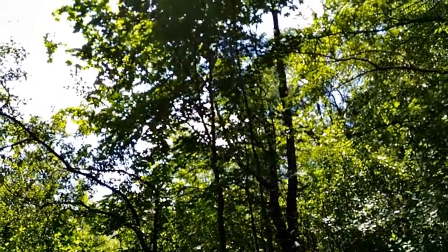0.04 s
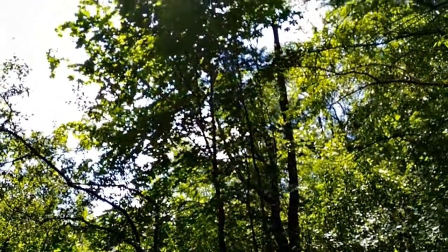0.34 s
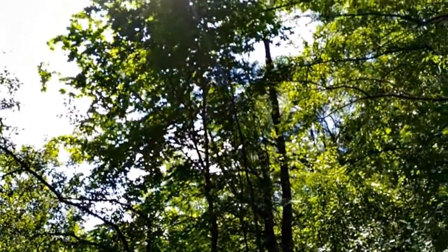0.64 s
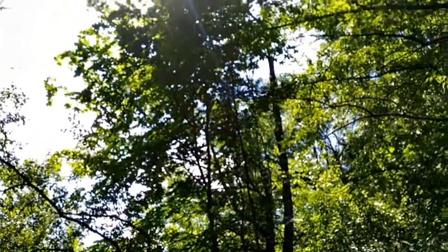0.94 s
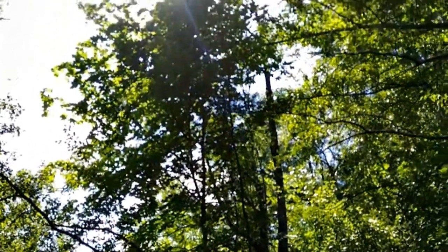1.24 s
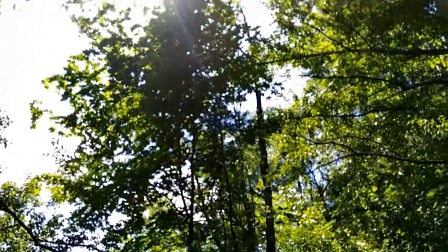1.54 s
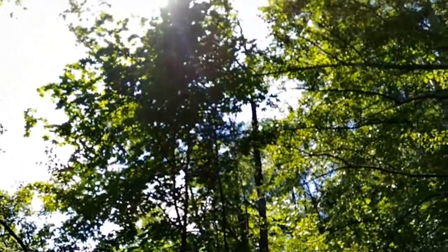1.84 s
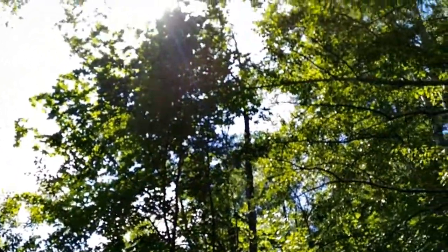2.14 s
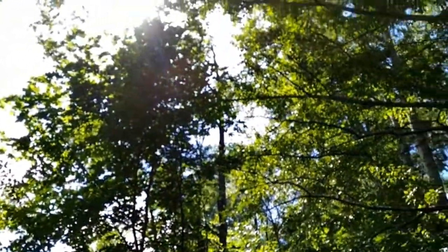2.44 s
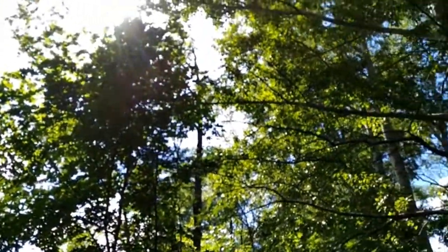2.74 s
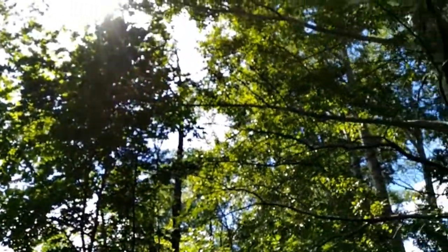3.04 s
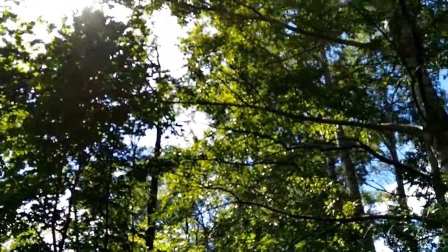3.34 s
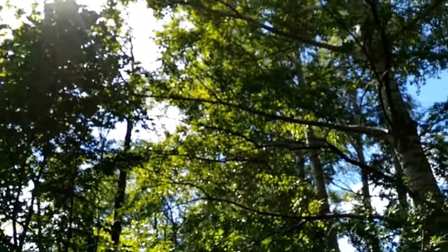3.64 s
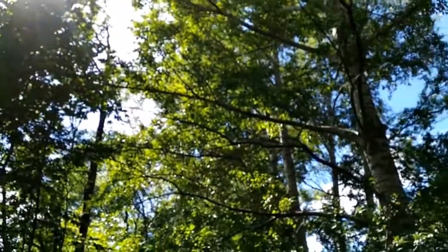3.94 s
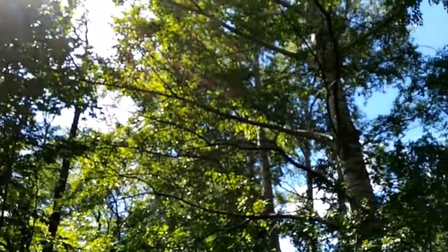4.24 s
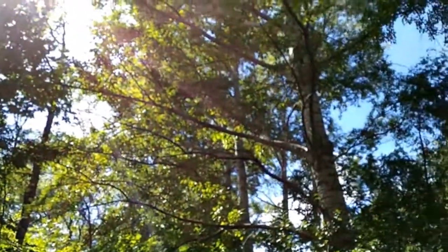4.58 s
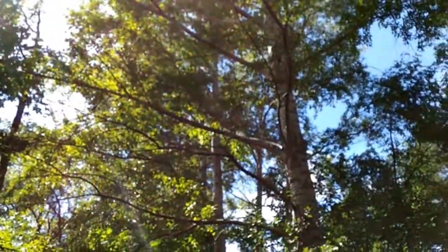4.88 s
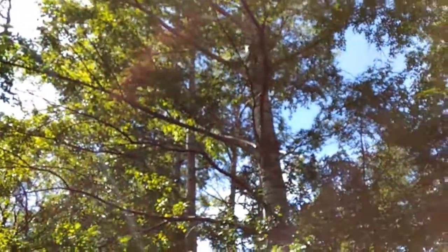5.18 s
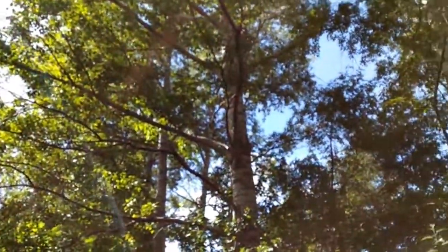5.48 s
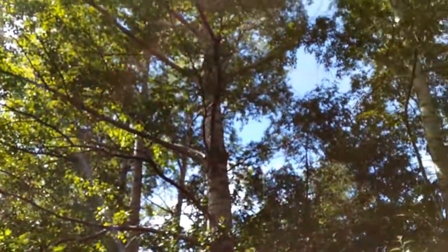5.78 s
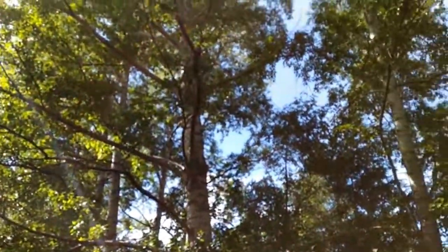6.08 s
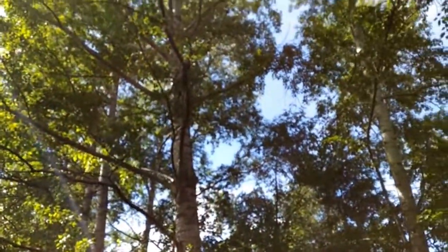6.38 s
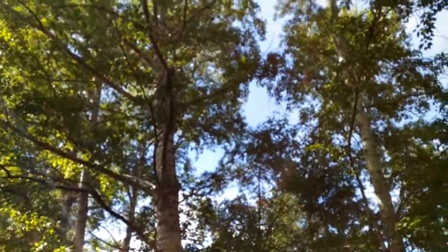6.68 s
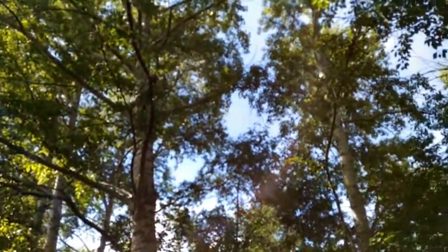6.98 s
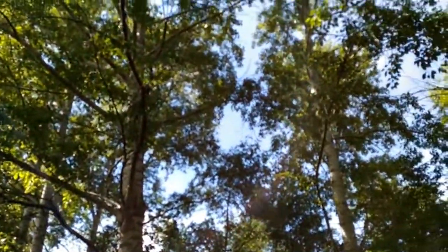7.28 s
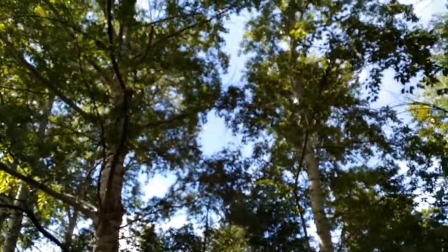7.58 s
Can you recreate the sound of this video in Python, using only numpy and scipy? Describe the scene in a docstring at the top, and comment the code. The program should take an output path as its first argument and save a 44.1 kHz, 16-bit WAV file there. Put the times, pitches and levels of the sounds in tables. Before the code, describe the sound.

Clear, high, downward chirps come steadily from one woodland bird, with a low engine rumble and a light breeze in the leaves behind.

```python
"""Songbird in a wood

Air moving through leaves makes a wash of noise over the low drone of a distant engine.
A small songbird's syrinx sounds twenty down-slurred, almost pure notes; trunks and leaves scatter each.
Other birds whistle thinly far off, and shoes shifting on the forest floor scuff softly nearby."""
import sys
import numpy as np
from scipy import signal
from scipy.fft import rfft, irfft
from scipy.io import wavfile
from scipy.ndimage import uniform_filter1d

SR = 44100
rng = np.random.default_rng(int(sys.argv[2]) if len(sys.argv) > 2 else 0)


def transcribe(u):
    """Save the signal u as a 16-bit wav file named by the first command-line argument.

    u: samples, shape (n,) or (channels, n), limited to [-1, 1]; the rate is SR.
    q: integer samples, one column per channel.
    """
    v = np.clip(np.atleast_2d(u).T, -1, 1)
    q = np.round(v * 32767).astype(np.int16)
    wavfile.write(sys.argv[1], SR, q)


N = 336042
TIME = np.arange(N) / SR
BINS = np.fft.rfftfreq(N, 1 / SR)
# The breeze in the crowns. Each row: time in seconds, rustle level in dB.
BREEZE_DB = [(0, -61.5), (.9, -65.5), (2.3, -66), (3.2, -71), (4.7, -68), (6, -73), (6.8, -68.5),
             (7.1, -80.5)]


def amp(db):
    """Amplitude ratio from decibels."""
    return 10 ** (np.asarray(db) / 20)


def unit(x):
    """Normalisation to rms 1."""
    return x / np.sqrt(np.mean(x ** 2) + 1e-20)


def read(points, hz):
    """Interpolation on a log-frequency axis."""
    f, value = np.transpose(points)
    return np.interp(np.log(hz + 1), np.log(f + 1), value)


def follow(points):
    """Linear interpolation of a time curve at each sample."""
    return np.interp(TIME, *np.transpose(points))


def add(mix, s, sound):
    """Superposition of a sound on the mix, starting at s seconds."""
    part = mix[max(round(s * SR), 0):][:len(sound)]
    part += sound[:len(part)]


def noise(gain):
    """Spectral shaping of white noise by a gain at each frequency, to rms 1."""
    return unit(irfft(rfft(rng.standard_normal(N)) * gain, N))


def drift(rate_hz):
    """Random fluctuation: low-pass noise of rms 1."""
    return noise(np.exp(-(BINS / rate_hz) ** 2) * (BINS > 0))


def leaves(patchy_db=2.5, flutter_db=2.7, hiss_db=-69.5):
    """Flow noise in foliage: a low wash and a fluttering rustle drift in patches over a steady hiss."""
    # Three noise spectra. Each row: frequency in Hz, relative spectral level in dB.
    wash_spectrum = [(70, -21), (130, 1), (200, 0), (370, -3), (940, -3.5), (1200, -7), (2100, -12),
                     (2900, -13), (5000, -30.5)]
    rustle_spectrum = [(700, -13), (1100, -5), (1500, -1), (2200, -0.5), (2600, -11.5), (3300, -13.5),
                       (6000, -35)]
    hiss_spectrum = [(1000, -16), (2600, 1.5), (4200, 1), (5500, 1.5), (7000, -4.5), (8300, -10),
                     (11000, -18.5), (14300, -32)]
    # The swell of the wash. Each row: time in seconds, level in dB.
    wash_db = [(0, -65.5), (.9, -62.5), (3, -63.5), (5.3, -62), (6.8, -65), (7.62, -66.5)]
    wash = amp(follow(wash_db)) * noise(amp(read(wash_spectrum, BINS)))
    rustle = amp(follow(BREEZE_DB) + flutter_db * drift(40)) * noise(amp(read(rustle_spectrum, BINS)))
    spectra = signal.stft(wash + rustle, SR, nperseg=1024, noverlap=768)[2]
    patches = rng.standard_normal(spectra.shape)
    for axis in 0, 1:  # smooth over frequency, then time
        patches = uniform_filter1d(patches, size=16, axis=axis, mode="wrap")
    breeze = signal.istft(spectra * amp(patchy_db * unit(patches)), SR, nperseg=1024, noverlap=768)[1]
    return breeze[:N] + amp(hiss_db) * noise(amp(read(hiss_spectrum, BINS)))


def distant_engine(drone_hz=44.43, waver=0.0181, surge_hz=5):
    """Atmospheric fading: two engine orders and a rumble each swell and sink, under faint whines."""
    # The rumble ahead of its low-pass. Each row: frequency in Hz, relative spectral level in dB.
    rumble_spectrum = [(8.8, -45), (15, -10.5), (32, -6.5), (64, 1), (86, -1.5), (101, 2.5), (119, -0.5),
                       (160, -36), (210, -32), (350, -120)]
    # The gain shared by drone and rumble. Each row: time in seconds, gain in dB.
    engine_db = [(0, -59.5), (.3, -60), (.6, -55), (1.5, -56.5), (2.3, -59.5), (3, -57.5), (4.3, -55.5),
                 (5.25, -54), (5.6, -57), (6.85, -55), (6.98, -62.5), (7.62, -61.5)]
    # Narrow bands of noise. Each row: centre in Hz, width in Hz, level in dB.
    whine_bands = [(1411.5, 35, -74), (1848, 12, -80), (2030, 220, -80)]
    phase = 2 * np.pi * np.cumsum(drone_hz * (1 + waver * drift(2.245))) / SR
    first = amp(-8 + 4 * drift(surge_hz)) * np.sin(phase)
    second = amp(-4 + 2 * drift(surge_hz)) * np.sin(2 * phase)
    colour = amp(read(rumble_spectrum, BINS)) / (1 + (BINS / 85) ** 4)
    rumble = amp(-6 + 3.5 * drift(surge_hz)) * noise(colour)
    whines = sum(amp(db) * noise(1 / (1 + (2 * (BINS - hz) / width) ** 2))
                 for hz, width, db in whine_bands)
    carry = unit(amp(follow(BREEZE_DB) / 2))  # the breeze carries the whines over
    return amp(follow(engine_db)) * (np.sqrt(2) * (first + second) + rumble) + whines * carry


def syrinx(hz, octave_db=-50):
    """Nearly sinusoidal oscillation: a pure tone with a trace of its second harmonic."""
    phase = 2 * np.pi * np.cumsum(hz) / SR
    return np.sqrt(2) * (np.sin(phase) + amp(octave_db) * np.sin(2 * phase))


def note(ledge_hz, hold_s, ending, dive_db, ledge_db,
         top_hz=6462, top_db=-9, settle_s=.04, attack_s=0.0039, release_s=0.015):
    """Source and filter: pitch dives to a ledge, then turns; throat and beak weight the amplitude."""
    # Named endings. Each row: target pitch in Hz, glide time in seconds, length in seconds,
    # level change over a full glide in dB.
    endings = {"drop": (3151, .04, .044, -13), "lift": (3726, 0.0153, 0.039, 5.3),
               "stop": (3150, 0.7, .008, -3)}
    # Transmission of throat and beak. Each row: frequency in Hz, gain in dB.
    beak = [(3100, -1), (3700, 0), (4400, -0.5), (5000, -1), (5700, -0.75), (6400, -1)]
    end_hz, glide_s, end_s, end_db = endings[ending]
    t = np.arange(0, hold_s + end_s, 1 / SR)
    depth_hz = top_hz - ledge_hz
    dive_s = .0097 * np.sqrt(depth_hz / 1999)  # deeper dives take longer
    height = np.exp(-(t / dive_s) ** 1.205)
    turned = np.sin(np.pi / 2 * np.clip((t - hold_s) / glide_s, 0, 1))
    hz = ledge_hz + depth_hz * height + (end_hz - ledge_hz) * turned ** 2
    effort_db = ledge_db + (dive_db - ledge_db) * np.exp(-(t / settle_s) ** 2)
    gate = np.minimum(t / attack_s, 1) * np.minimum((t[-1] - t) / release_s, 1)
    return hz, gate * amp(effort_db + top_db * height + end_db * turned + read(beak, hz))


def songbird(waver=0.0096, chip_waver=0.019, chip_s=0.0367, chip_fall_hz=476):
    """Frequency modulation of the syrinx: slurred notes, many followed by a soft, buzzier chip."""
    # The notes. Each row: start in seconds, ledge pitch in Hz, seconds to the end of the ledge,
    # name of the ending, effort in the dive in dB, effort on the ledge in dB.
    song = [ (.061, 5010, 0.029, "drop", -37, -34.5), (.390, 4266, .073, "drop", -38, -38.5),
            (.717, 3749, 0.082, "drop", -37.5, -41), (1.078, 3812, 0.1, "drop", -38.5, -40),
            (1.461, 5029, .034, "drop", -35.5, -32), (1.778, 4358, 0.075, "drop", -32, -38),
            (2.147, 3510, 0.061, "lift", -33, -41), (2.458, 3206, .102, "stop", -35, -48),
            (2.827, 3573, 0.055, "lift", -35.4, -40.5), (3.183, 4375, .076, "drop", -35.3, -37),
            (3.508, 4950, 0.043, "drop", -34.5, -35), (3.872, 3765, 0.078, "stop", -33.5, -38),
            (4.212, 3198, 0.1, "stop", -34.5, -50), (4.587, 3568, .065, "lift", -36, -38.8),
            (4.985, 4426, 0.071, "drop", -36, -41), (5.340, 4880, .047, "drop", -36, -34.5),
            (5.668, 3816, 0.084, "drop", -36.5, -37), (6.023, 3496, 0.066, "lift", -35.9, -41),
            (6.347, 3164, 0.09, "stop", -37, -51.5), (6.717, 3820, 0.077, "drop", -34, -37.5), ]
    # The falling chips. Each row: start in seconds, last pitch in Hz, level in dB.
    chips = [ (.154, 3965, -50), (.849, 3654, -45.5), (1.224, 3603, -44), (1.904, 3770, -44),
             (2.573, 3530, -42), (2.967, 3730, -41.5), (3.313, 3757, -40.5), (3.611, 3660, -41.5),
             (3.947, 4190, -38.3), (4.329, 3530, -39.5), (4.717, 3740, -45.2), (5.118, 3915, -41.5),
             (5.443, 3556, -46.5), (6.465, 3580, -47.5), ]
    out = np.zeros(N)
    unsteady = 1 + waver * drift(150)
    for s, *shape in song:
        glide, level = note(*shape)
        add(out, s, level * syrinx(glide * unsteady[round(s * SR):][:len(glide)]))
    unsteady = 1 + chip_waver * drift(250)
    n = round(chip_s * SR)
    for s, last_hz, db in chips:
        glide = last_hz + chip_fall_hz * np.linspace(1, 0, n) ** 1.156
        chip = syrinx(glide * unsteady[round(s * SR):][:n])
        add(out, s, amp(db) * signal.windows.tukey(n, .6) * chip)
    return out


def trees(x, leaves_db, trunks_db, twigs_db=-8, build_s=0.0035, echoes=12):
    """Reflection and scattering: quick echoes from twigs, later ones from trunks, a tail from crowns."""
    # Decay of the scatter. Each row: frequency in Hz, time to fall 60 dB in seconds.
    decay_times = [(2500, 0.54), (3700, 0.34), (4600, 0.49), (6200, 0.53)]
    taps = rng.standard_normal(SR) * (rng.random(SR) < .1) * (1 - np.exp(-TIME[:SR] / build_s))
    hz, frame_s, spectra = signal.stft(taps, SR, nperseg=256)
    decay = amp(-60 * frame_s / read(decay_times, hz)[:, None])
    tail = signal.istft(spectra * decay, SR, nperseg=256)[1]
    response = amp(leaves_db) * tail / np.linalg.norm(tail)
    for first_s, last_s, db in (.001, .012, twigs_db), (.012, .07, trunks_db):
        delays = (rng.uniform(first_s, last_s, size=echoes) * SR).astype(int)
        response[delays] += amp(db) * rng.choice([-1, 1], size=echoes) / np.sqrt(echoes)
    return signal.fftconvolve(x, response)[:N]


def swaying_trees(x, leaves_db, trunks_db, patterns=3, sway_hz=0.3943):
    """Time-varying multipath: echo patterns crossfade slowly as the bird and the branches move."""
    turn = 2 * np.pi * sway_hz * TIME
    shares = [np.sqrt(2 / patterns) * np.cos(turn + np.pi * k / patterns) for k in range(patterns)]
    return sum(trees(x * share, leaves_db, trunks_db) for share in shares)


def far_birds():
    """Random frequency modulation: shallow in the long thin whistles, deep in the warbled calls."""
    # Each row: start in seconds, length in seconds, first and last pitch in Hz, level in dB,
    # rms warble in Hz.
    calls = [ (.20, 0.058, 2960, 2760, -59.5, 74.07), (.43, 0.055, 3460, 3250, -55, 190),
             (.48, 0.063, 2830, 2570, -58, 130), (.575, 0.11, 4340, 4140, -49.5, 246),
             (3.80, 0.3, 4294, 4150, -54, 25), (4.15, 0.36, 4240, 4270, -59, 25),
             (5.85, 0.48, 3490, 3470, -63, 40.4), (6.5, 0.59, 3550, 3440, -68, 40),
             (7.05, .56, 3340, 3370, -69.5, 27.5), ]
    out, warble = np.zeros(N), drift(92)
    for s, length, first_hz, last_hz, db, depth_hz in calls:
        n = round(length * SR)
        hz = np.linspace(first_hz, last_hz, n) + depth_hz * warble[round(s * SR):][:n]
        add(out, s, amp(db) * signal.windows.tukey(n, .3) * syrinx(hz))
    return out


def shoes(grain_db=3.5):
    """Friction noise: short grainy scuffs and ticks of shoes on leaf litter."""
    # Each row: start in seconds, length in seconds, centre in Hz, width in octaves, level in dB.
    scuffs = [ (0.846, 0.023, 1260, 0.84, -53), (1.736, 0.074, 240, 1.92, -55),
              (2.146, 0.28, 5900, 0.53, -68.5), (2.517, 0.071, 506, 1.4, -60),
              (3.744, 0.037, 396, 0.91, -55.5), (4.358, 0.07, 600, 1.07, -59), (5.383, 0.03, 400, 1.1, -59),
              (6.347, 0.026, 380, 0.9, -52.5), (6.378, 0.02, 500, 1.54, -50), (6.57, 0.01, 2700, 0.13, -54),
              (7.209, 0.13, 500, 1.67, -61), ]
    out = np.zeros(N)
    for s, length, hz, octaves, db in scuffs:
        grit = rng.standard_normal(SR)
        grit *= amp(grain_db * unit(uniform_filter1d(rng.standard_normal(SR), size=120)))
        colour = np.exp(-.5 * (np.log2((np.arange(SR // 2 + 1) + 1) / hz) / octaves) ** 2)
        scuff = unit(irfft(rfft(grit) * colour))[:round(length * SR)]
        add(out, s, amp(db) * scuff * signal.windows.tukey(len(scuff), .6))
    return out


def scene():
    """Superposition: direct and scattered birdsong over leaves, engine and shoes, in one channel."""
    bird, far = songbird(), far_birds()
    song = amp(-5) * bird + swaying_trees(bird, leaves_db=-1.5, trunks_db=-13.5)
    others = amp(-6) * far + trees(far, leaves_db=-6.5, trunks_db=-11)
    return (song + others + leaves() + distant_engine() + shoes())[None]


def record(dry, open_db=-52, lift_db=7, knee_db=4, ahead_s=0.003, edge_hz=14350):
    """Expansion: a noise suppressor looks ahead and lifts the treble when loud; a low-pass follows."""
    x = dry[0]
    bird_band = irfft(rfft(x) * (BINS > 2500), N)
    power = uniform_filter1d(bird_band ** 2, size=2200)
    level_db = 10 * np.log10(abs(np.interp(TIME + ahead_s, TIME, power)) + 1e-12)
    opening = .5 + .5 * np.tanh((level_db - open_db) / (2 * knee_db))
    treble = irfft(rfft(x) * read([(6000, 0.22), (7200, 1)], BINS), N)
    x = x + treble * (amp(lift_db * opening) - 1)
    low_pass = signal.firwin(511, edge_hz, window=("kaiser", 8), fs=SR)
    return signal.oaconvolve(x, low_pass, "same")[None]


dry = scene()
out = record(dry)
transcribe(out)
```